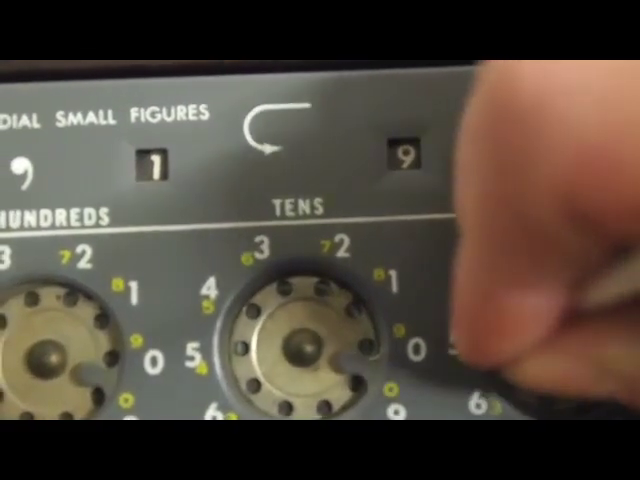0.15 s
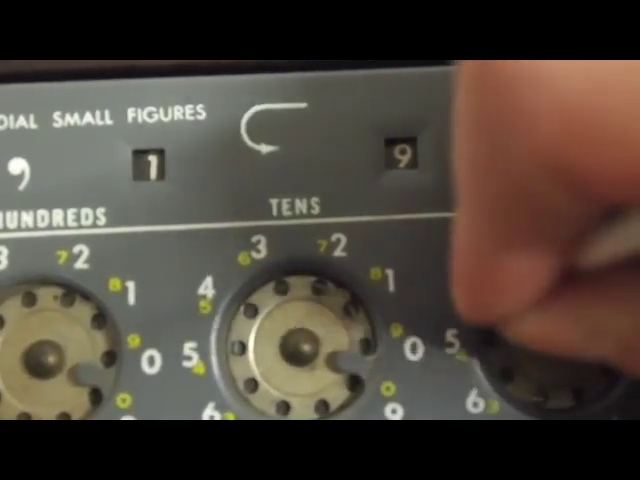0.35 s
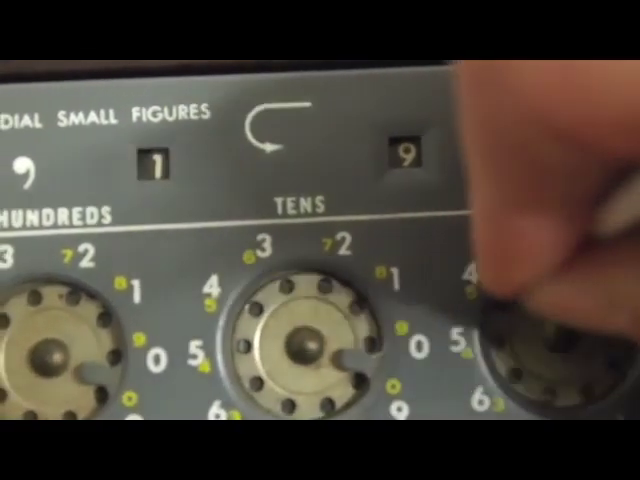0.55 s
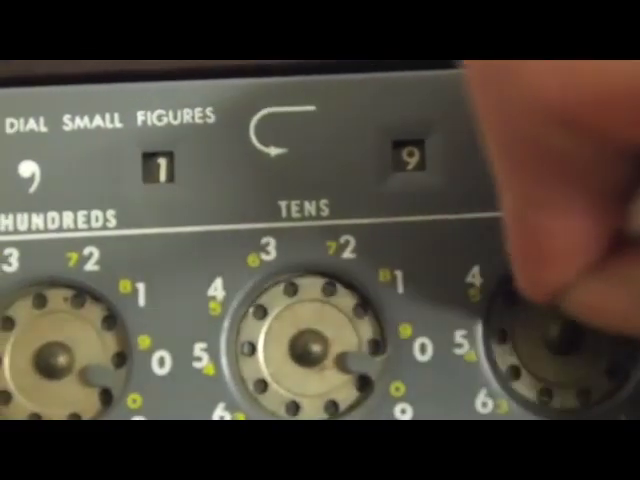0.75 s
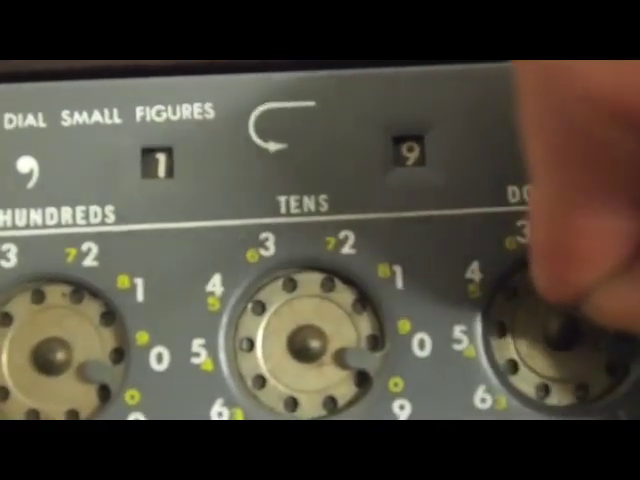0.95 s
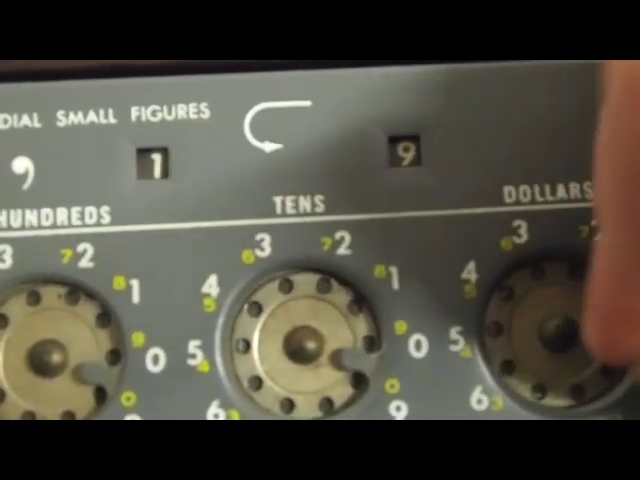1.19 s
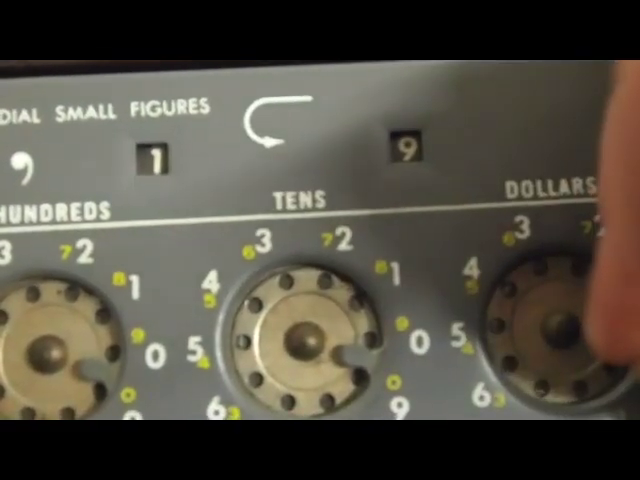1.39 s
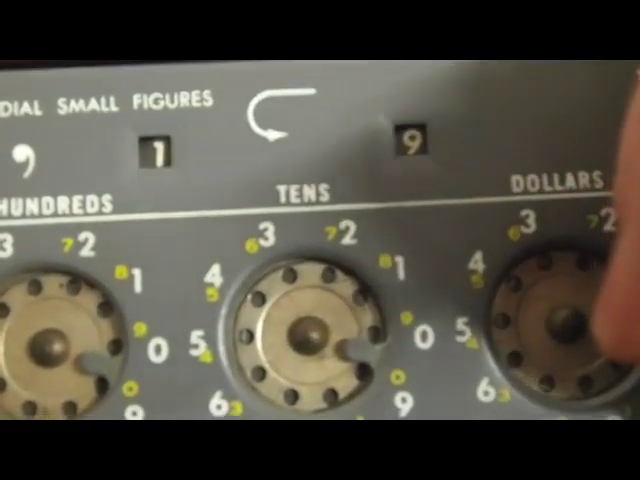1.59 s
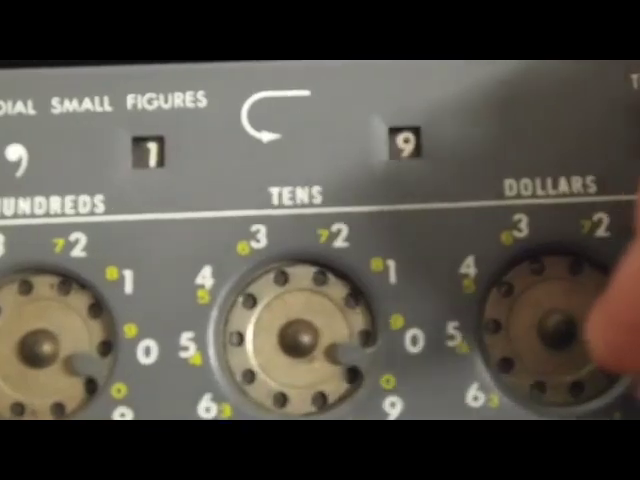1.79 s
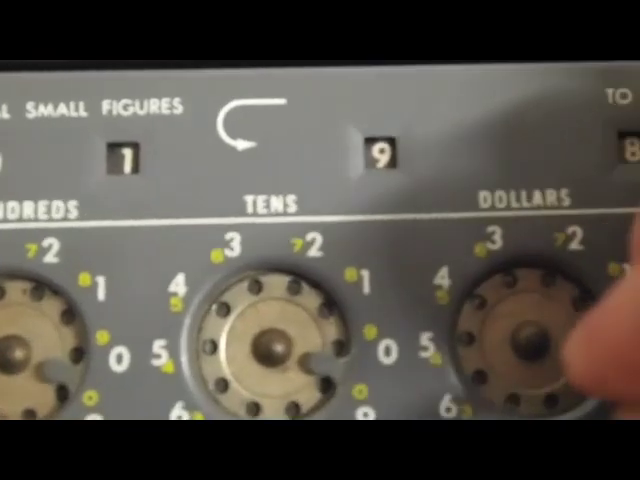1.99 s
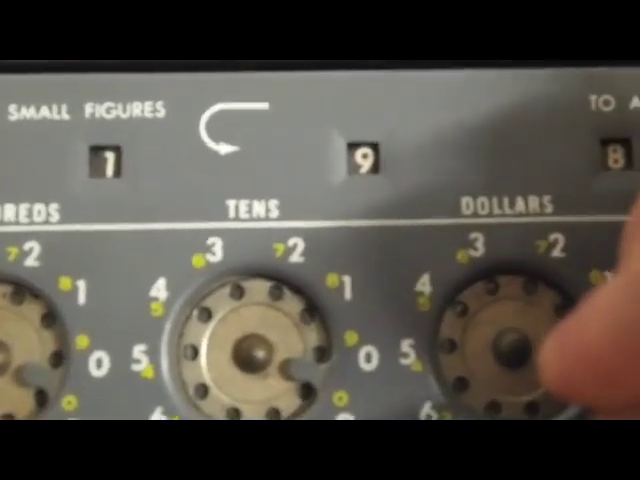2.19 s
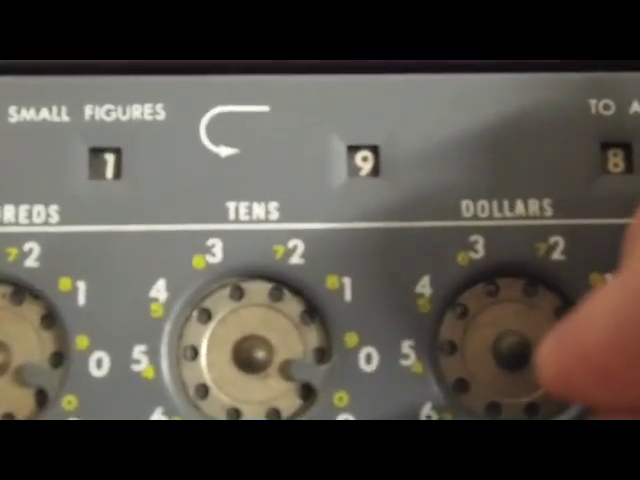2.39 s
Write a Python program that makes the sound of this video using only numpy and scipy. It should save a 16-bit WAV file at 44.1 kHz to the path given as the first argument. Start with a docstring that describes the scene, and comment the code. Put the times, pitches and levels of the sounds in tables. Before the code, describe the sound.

Bright steel ratchet clicks from a small mechanical adding machine come in an uneven run, a hollow case knock, then a short louder burst; faint rubbing and ticks follow, close microphone, quiet room, steady hiss.

```python
"""A small mechanical adding machine is dialled with a stylus, close to a camera in a quiet room.
The pawl chatters over steel teeth: each click is a dying burst of tiny contacts through steel resonances.
The wheel scrapes as grainy noise through the same steel; noisy blows of the stylus ring the hollow case.
A hand rubs the case softly; damped tones make dull thumps, and stylus ticks sound late.
The room adds a short tail to clicks, knocks and thumps, and the camera and room hiss steadily."""
import sys
import numpy as np
from scipy import signal
from scipy.fft import rfft, irfft, next_fast_len
from scipy.io import wavfile

SR = 44100
rng = np.random.default_rng(int(sys.argv[2]) if len(sys.argv) > 2 else 0)


def voltage_ratio(level):
    """Linear amplitude factor for a level in decibels (scalar or array-like)."""
    return 10 ** (np.asarray(level, float) / 20)


def wrap_up_sound(samples):
    """Save the sound to the file named by the first command line argument, as 16-bit audio."""
    columns = np.atleast_2d(samples).T
    # keep every value between -1 and 1, then stretch to whole-number steps
    tamed = np.clip(columns, -1, 1)
    steps = np.round(tamed * 32767).astype(np.int16)
    wavfile.write(sys.argv[1], SR, steps)


N = 108045  # length in samples


def unit(x):
    """Scale to rms 1."""
    return x / np.sqrt(np.mean(x ** 2) + 1e-20)


def along(points, hz):
    """Interpolate (f/Hz, value) points on a log frequency axis."""
    f, value = np.transpose(points)
    return np.interp(np.log(hz + 1), np.log(f + 1), value)


def curve(rows):
    """One value per sample from (t/s, value) rows."""
    s, value = np.transpose(rows)
    return np.interp(np.arange(N) / SR, s, value)


def add(out, s, sound):
    """Mix a sound in at time s."""
    out[round(s * SR):][:len(sound)] += sound


def filtered(x, response):
    """Filter x by a complex response of frequency."""
    m = next_fast_len(len(x) + SR // 8)
    spectrum = rfft(x, m) * response(np.fft.rfftfreq(m, 1 / SR))
    return irfft(spectrum, m)[:len(x)]


def ringing(table, gain_db, pitch=1):
    """Causal response of parallel resonances with alternating signs, each with an extra gain."""
    def response(f):
        total = 0
        for k, (centre, width, db) in enumerate(table):
            resonance = 1j * f * width / ((centre * pitch) ** 2 - f * f + 1j * f * width)
            total = total + (-1) ** k * voltage_ratio(db + gain_db[k]) * resonance
        return total
    return response


def chatter(count, uneven_db, grain_s):
    """Noise made of tiny contacts of uneven size, each holding its size for one grain."""
    size = np.repeat(rng.standard_normal(count), max(1, round(grain_s * SR)))[:count]
    return unit(rng.standard_normal(count) * voltage_ratio(uneven_db * size))


def steel(tilt_db, focus_db, scatter_db):
    """Response of the steel parts, tilted per octave and focused per octave squared about 5 kHz."""
    # dense resonances of wheels and pawl: (f/Hz, width/Hz, relative level/dB)
    steel_modes = [(1280, 420, -25), (1980, 760, 8), (2340, 100, -16), (2930, 1000, 6), (4550, 387, 4.5),
                   (5264, 347, 8.5), (6420, 2570, -3.5), (7190, 340, 0.5), (8470, 490, -4.5),
                   (9250, 890, -1), (10060, 1600, -5.5), (12040, 1440, -10.5)]
    octaves = np.log2(np.transpose(steel_modes)[0] / 5000)
    scatter = rng.normal(0, scatter_db, len(steel_modes))
    return ringing(steel_modes, tilt_db * octaves - focus_db * octaves ** 2 + scatter)


def case(t, hard_hz, pitch, damped_t60):
    """A sharp blow with a short bright rattle rings the case; a soft contact loses the high modes."""
    # resonances of the hollow case: (f/Hz before the pitch factor, width/Hz, relative level/dB)
    case_modes = [(222, 34, -8), (397, 23, -9), (641.4, 20, 14), (765, 214, 0), (900, 135, 3.5),
                  (1150, 81, 2), (1450, 280, -2.5), (1618, 95, 5), (1800, 160, -1), (2480, 190, -6),
                  (2940, 390, -6), (3470, 283, -8), (4140, 220, -8.5)]
    contact_t60_s = 0.056
    rattle = 2.8 * np.diff(rng.standard_normal(len(t) + 1))
    blow = (rattle + 9 * (t == 0)) * voltage_ratio(-60 * t / contact_t60_s)
    body = ringing(case_modes, rng.normal(0, 1, len(case_modes)), pitch)
    ring = filtered(blow, lambda f: body(f) / (1 + 1j * f / hard_hz) ** 2)
    ring = ring * voltage_ratio(-60 * t / damped_t60)
    return ring / np.sqrt(np.sum(ring ** 2) / (0.0049 * SR))  # equal energy for every blow


def scrape():
    """Grainy friction of the turning wheel through the steel; the push also thrums the table."""
    # the wheel scraping as it turns: (t/s, level/dB)
    scrape_levels = [(0, -49.5), (.03, -51.5), (.06, -68), (.14, -59.5), (.17, -45.5), (.185, -57),
                     (.24, -50), (.3, -67), (.35, -58), (.385, -36), (.42, -38.5), (.47, -63), (.53, -55.5),
                     (.6, -49.5), (.65, -51), (.69, -53), (.8, -51.5), (.9, -61), (1.08, -70), (1.093, -45),
                     (1.14, -46), (1.185, -35), (1.225, -31.5), (1.25, -52), (1.4, -65), (1.5, -76)]
    grit_db, grain_s = 3, 0.0012
    thrum_db, thrum_hz, thrum_width_hz = -17, 130, 70
    rub = unit(filtered(chatter(N, grit_db, grain_s), steel(0.73, 2.3, 0)))
    thrum_response = ringing([(thrum_hz, thrum_width_hz, 0)], [0])
    thrum = unit(filtered(rng.standard_normal(N), thrum_response))
    level_db = curve(scrape_levels)
    thrum_level_db = 0.75 * (level_db + 46.5) - 51.5 + thrum_db  # follows the scrape, less steeply
    return voltage_ratio(level_db) * rub + voltage_ratio(thrum_level_db) * thrum


def slide():
    """Soft lumpy rubbing of a hand: uneven noise grains, dull through the case."""
    # a hand sliding on the case: (t/s, relative level/dB)
    slide_levels = [(0, -61.5), (.1, -74), (.4, -63), (.55, -72.5), (.75, -66), (.95, -59), (1.08, -70.5),
                    (1.3, -70.5), (1.7, -70), (1.79, -61), (1.95, -67), (2.05, -71.5), (2.12, -60.5),
                    (2.2, -66), (2.45, -70)]
    # dull colour of the rubbing: (f/Hz, relative level/dB)
    slide_colour = [(60, -11), (130, -7.5), (330, 1.5), (570, -0.5), (750, -1.5), (1300, -8.5), (2500, -21)]
    lumps = chatter(N, 3.3, 0.0043)
    rub = unit(filtered(lumps, lambda f: voltage_ratio(along(slide_colour, f))))
    return voltage_ratio(curve(slide_levels) + 0.5) * rub


def hiss():
    """Steady noise of the camera and the room, shaped by a fixed spectrum."""
    # colour of the hiss: (f/Hz, relative spectral level/dB)
    hiss_colour = [(15, -38), (25, -10), (113, -5.5), (226, 0.5), (294, -2.5), (449, -8), (486, 1),
                   (651, -2), (1050, 0.5), (12300, -6), (14100, -2.5)]
    hiss_db = -57.5
    return voltage_ratio(hiss_db) * unit(filtered(rng.standard_normal(N), lambda f: voltage_ratio(along(hiss_colour, f))))


def pawl():
    """Each click is a snap and a dying burst of contacts that rings the steel and, weakly, the case."""
    # pawl clicks: (t/s, relative level/dB, chatter t60/s, brightness/dB per octave,
    # focus/dB per octave squared)
    clicks = [(0.0887, -26, 0.044, 5.5, 6), (0.1264, -41.5, 0.03, 4.5, -1),
              (0.1981, -25.5, 0.057, 4.5, 8.5), (0.2074, -36, 0.012, 4, -16),
              (0.2272, -45, 0.086, 1, -12.5), (0.2454, -33.5, 0.044, 6.5, -2.5),
              (0.2545, -22.5, 0.038, 6.5, -0.7), (0.3289, -27, 0.024, 8.5, 10),
              (0.344, -35.5, 0.099, -4, 6.5), (0.3699, -29, 0.045, -23, 27),
              (0.3902, -23.5, 0.062, 9.5, 11), (0.4004, -33, 0.022, 5, -1), (0.41, -19.5, 0.022, 6, 2),
              (0.4345, -44, 0.046, 14, 8), (0.4534, -39, 0.053, 4, 4), (0.4915, -33.5, 0.048, 4, 6),
              (0.549, -45.5, 0.16, -14, 12), (0.597, -27.5, 0.06, -4, 13.5),
              (0.6261, -34.5, 0.1, -11.5, 17.5), (0.634, -23, 0.043, 6.5, 4),
              (0.6582, -44.5, 0.16, -21, -4.5), (0.6927, -19, 0.041, 8, 4),
              (0.701, -36.5, 0.12, -7.5, -6.5), (0.7392, -27.5, 0.029, 0, -5.5),
              (0.7586, -30.5, 0.026, -14, 21), (0.7875, -38, 0.038, -1, 8), (0.812, -27.5, 0.11, 6.5, -2),
              (0.817, -15, 0.05, 5.5, 4), (0.8413, -17, 0.046, 7, 4.5), (1.0943, -25, 0.057, 1, 15),
              (1.1159, -22, 0.048, 3.5, 3.5), (1.1395, -28, 0.052, -2, 2.5), (1.1489, -20, 0.054, 14.5, 15),
              (1.1708, -9.5, 0.022, 8.5, 3.5), (1.2016, -17, 0.026, 6.5, 11),
              (1.2142, -15.5, 0.052, 8.5, 8.5), (1.2301, -9, 0.03, 9, -1.1)]
    uneven_db, grain_s, rise_s = 1.5, 0.0005, 0.0007
    snap_db, snap_t60_s = 1, 0.01
    scatter_db = 1.5  # random spread of the steel resonances from click to click
    case_share_db = -24  # how much of a click reaches the case
    out, t = np.zeros(N + SR), np.arange(SR // 5) / SR
    for s, db, t60, tilt_db, focus_db in clicks:
        decay = voltage_ratio(-60 * t / t60) + voltage_ratio(snap_db - 60 * t / snap_t60_s)
        burst = chatter(len(t), uneven_db, grain_s) * decay * (1 - np.exp(-t / rise_s))
        click = filtered(burst, steel(tilt_db, focus_db, scatter_db))
        click = click / np.sqrt(np.sum(click ** 2) / (t60 * SR / 8))  # longer chatter gets more energy
        case_ring = case(t, 1500, 0.98, 1.0)
        add(out, s, voltage_ratio(db - 5.5) * (click + voltage_ratio(case_share_db) * case_ring))
    return out[:N]


def thumps():
    """Soft dull thumps, one of them the low body of the hard knock: a quickly damped tone with one
    weak overtone."""
    # dull thumps: (t/s, relative level/dB, pitch f/Hz)
    thump_rows = [(.706, -45.5, 377), (.7372, -24, 705.5), (1.766, -37.5, 500), (1.782, -51, 425),
                  (1.94, -58, 570), (2.005, -57.5, 576), (2.081, -53.5, 590), (2.165, -59, 570),
                  (2.411, -51.5, 542)]
    rise_s, t60_s = 0.0015, 0.027
    overtone_ratio, overtone_db = 2.21, -15.5
    out, t = np.zeros(N + SR), np.arange(SR // 4) / SR
    for s, db, hz in thump_rows:
        tone = np.sin(2 * np.pi * hz * t)
        tone += voltage_ratio(overtone_db) * np.sin(2 * np.pi * hz * overtone_ratio * t)
        envelope = voltage_ratio(db + 12.5 - 60 * t / t60_s) * (1 - np.exp(-t / rise_s)) ** 2
        add(out, s, envelope * tone)
    return out[:N]


def knocks():
    """The stylus strikes the hollow case, whose panel stiffens under harder blows."""
    # knocks on the case: (t/s, level/dB, hardness f/Hz, t60/s of damping by the hand)
    knock_rows = [(0.7374, -15.5, 3230, 0.064), (0.9177, -22, 2520, 0.23), (1.0086, -35.5, 590, 0.02),
                  (1.173, -34, 600, 0.76), (1.231, -46, 580, 0.27), (1.268, -45.5, 596, 0.26)]
    stiffening = 2.2  # the panel's pitch rises with the square of the blow
    out, t = np.zeros(N + SR), np.arange(SR // 4) / SR
    for s, db, hard_hz, damping_t60 in knock_rows:
        pitch = 1 + stiffening * voltage_ratio(db) ** 2
        add(out, s, voltage_ratio(db) * case(t, hard_hz, pitch, damping_t60))
    return out[:N]


def ticks():
    """The stylus tip ticks the plate: a short rattle into one resonance, with a weaker edge of steel."""
    # lone ticks: (t/s, relative level/dB, pitch f/Hz, width/Hz of the resonance before it is squared)
    tick_rows = [(1.798, -53.5, 4230, 250), (1.927, -55.5, 3000, 910), (2.224, -36.5, 2820, 900)]
    t60_s, edge_db = 0.031, -4
    out, t = np.zeros(N + SR), np.arange(SR // 10) / SR
    for s, db, hz, width_hz in tick_rows:
        burst = (rng.standard_normal(len(t)) + 10 * (t == 0)) * voltage_ratio(-60 * t / t60_s)
        resonance = ringing([(hz, width_hz, 0)], [0])
        ping = unit(filtered(burst, lambda f: resonance(f) ** 2))
        edge = unit(filtered(burst, steel(0.36, 2.9, 0)))
        add(out, s, voltage_ratio(db - 13.5) * (ping + voltage_ratio(edge_db) * edge))
    return out[:N]


def room(x):
    """A noise tail answers the sound; each frequency of it dies at its own speed."""
    # decay of the room: (f/Hz, t60/s)
    room_decay = [(200, 0.15), (1000, 0.27), (5000, 0.35), (12000, 0.28)]
    delay_s, blur_s = 0.003, 0.002
    hz, t, z = signal.stft(rng.standard_normal(SR // 2), SR, nperseg=256)
    decay = voltage_ratio(-60 * t / along(room_decay, hz)[:, None])
    tail = signal.istft(z * decay, SR, nperseg=256)[1]
    # scattering blurs the narrow rings: the sign flips at random
    signs = np.repeat(rng.choice([-1, 1], N), round(blur_s * SR))[:N]
    delayed = np.pad(x * signs, (round(delay_s * SR), 0))
    return signal.fftconvolve(delayed, tail / np.linalg.norm(tail))[:N]


def scene():
    """Machine with its room, the faint ticks, the scrape, the sliding hand and the hiss."""
    room_db = -13.5
    machine = pawl() + knocks() + thumps()
    mix = machine + voltage_ratio(room_db) * room(machine) + ticks() + scrape() + slide() + hiss()
    return mix[None]  # one channel


def top_cut(x):
    """Nothing passes above the cut-off."""
    return signal.sosfilt(signal.butter(12, 13900, fs=SR, output="sos"), x)


def record(dry):
    """The microphone path has a narrow dip, a gentle bass limit and a steep treble limit."""
    notch_hz, notch_width_hz, notch_depth = 7860, 175, 0.94
    bass_hz, top_hz, top_width_hz = 108, 13550, 220

    def microphone(f):
        notch = 1 - notch_depth * np.exp(-((f - notch_hz) / notch_width_hz) ** 2)
        bass_limit = 1 / (1 + bass_hz / (1j * f + 0.0011))  # the small term avoids dividing by zero
        treble_limit = 1 / (1 + np.exp(np.clip((f - top_hz) / top_width_hz, -50, 50)))
        return notch * bass_limit * treble_limit

    mix = filtered(dry[0], microphone)[None]
    return top_cut(mix)


dry = scene()
out = record(dry)
wrap_up_sound(out)
```